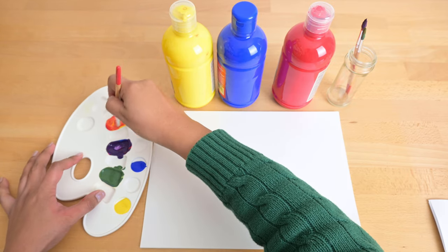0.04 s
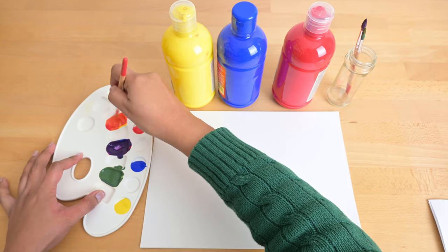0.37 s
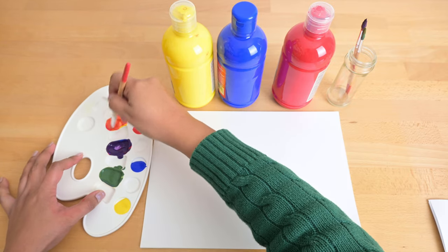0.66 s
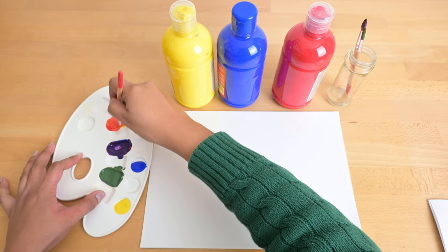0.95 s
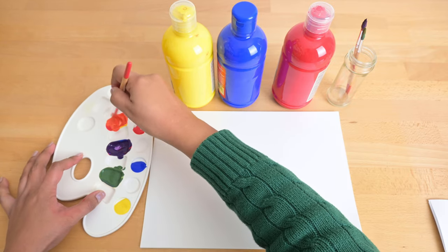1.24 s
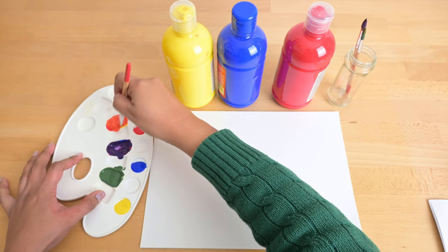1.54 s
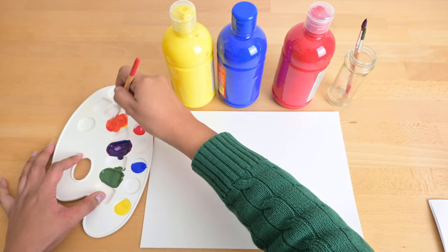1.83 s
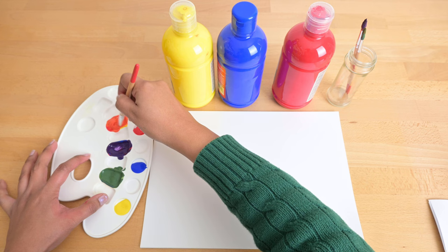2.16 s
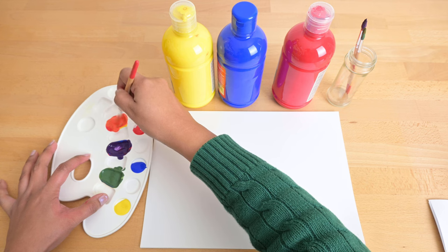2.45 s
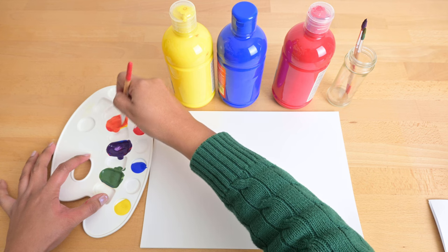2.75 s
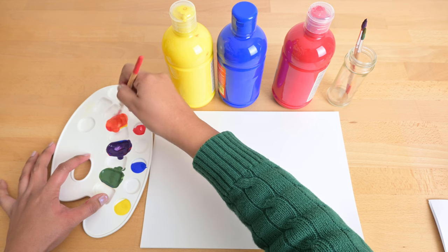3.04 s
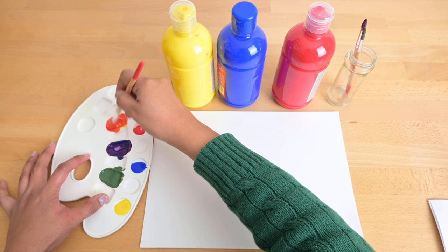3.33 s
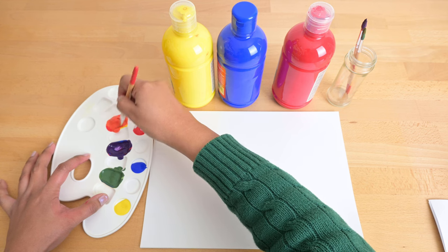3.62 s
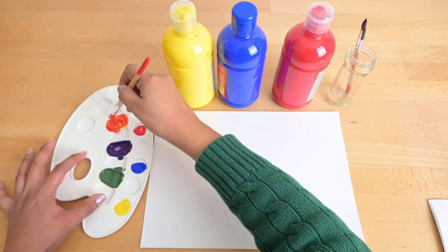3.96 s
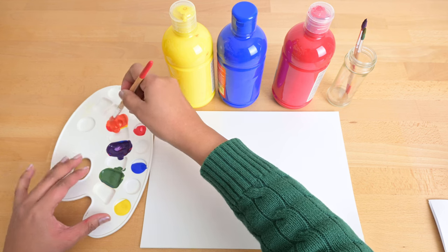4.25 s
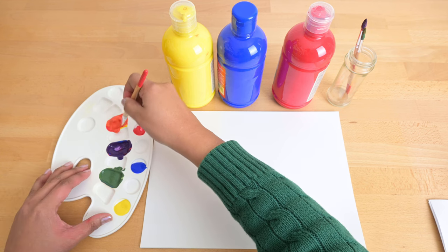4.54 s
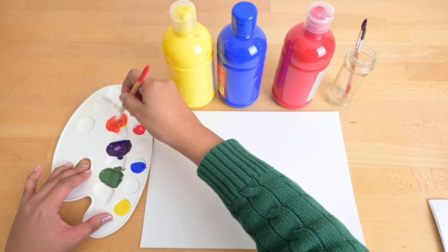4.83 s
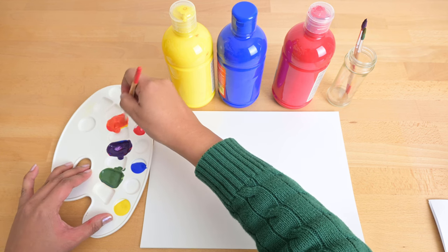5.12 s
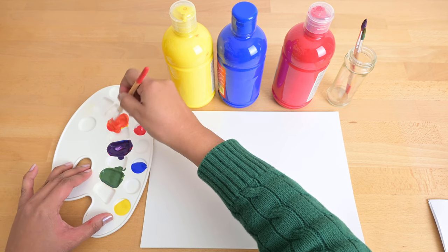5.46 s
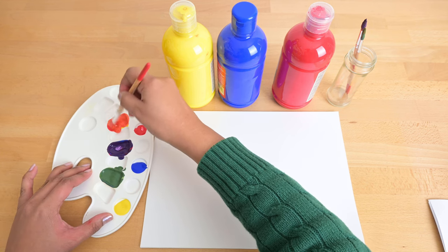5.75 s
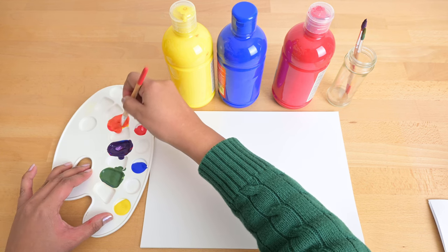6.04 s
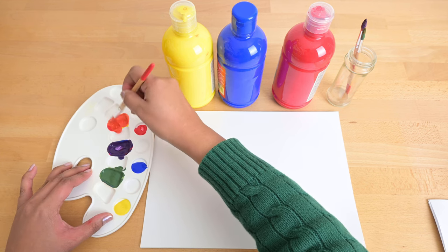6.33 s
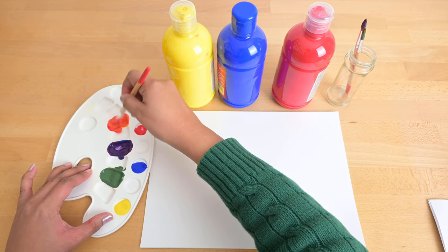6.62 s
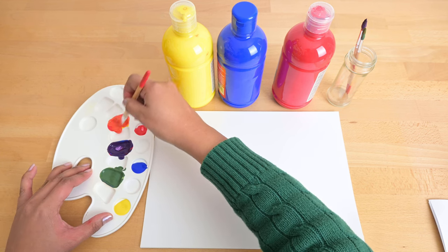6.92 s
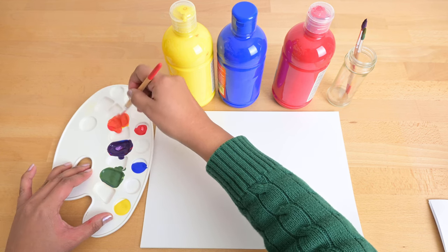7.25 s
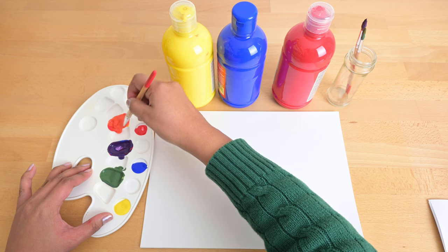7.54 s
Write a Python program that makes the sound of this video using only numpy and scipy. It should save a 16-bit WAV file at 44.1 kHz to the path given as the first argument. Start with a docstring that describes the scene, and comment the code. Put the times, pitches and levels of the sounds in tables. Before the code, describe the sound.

Quick, light knocks and faint swishes of a brush mixing paint in a plastic palette well, in a quiet room.

```python
"""In a small, quiet room, sticky paint rustles faintly in the well of a plastic palette on a wooden table.
A paintbrush starts dabbing, close to five times a second: the bristles swish and push the palette, and
the ferrule knocks the plate, brighter the harder it lands. From about one second on, the held palette
now and then bumps the table, clacks and slides, and the wet paint gives a few tiny ticks. The dabs
pause near four seconds, then resume and turn mostly lighter."""
import sys
import numpy as np
from scipy import signal
from scipy.fft import rfft, irfft, next_fast_len
from scipy.io import wavfile

SR = 44100
rng = np.random.default_rng(int(sys.argv[2]) if len(sys.argv) > 2 else 0)


def inscribe(sig):
    """Save sig as 16-bit PCM at rate SR to the path in sys.argv[1].

    A 1-D sig is mono; a 2-D sig holds one channel per row.
    Samples are clipped to [-1, 1] before scaling.
    """
    pcm = np.round(np.clip(np.atleast_2d(sig).T, -1, 1) * 32767)
    wavfile.write(sys.argv[1], SR, pcm.astype(np.int16))


N = 343098
TIME_S = np.arange(N) / SR
RING_S = TIME_S[:SR // 2]


def from_db(db):
    return 10 ** (np.asarray(db) / 20)


def unit_rms(x):
    return x / np.sqrt(np.mean(x ** 2) + 1e-20)


def at_hz(points, hz):
    """Reads a table on a log-frequency axis."""
    knots_hz, values = np.transpose(points)
    return np.interp(np.log(hz), np.log(knots_hz), values)


def add(track, start_s, sound):
    """Mixes a sound into a track in place."""
    start = max(round(start_s * SR), 0)
    span = track[start:start + len(sound)]
    span += sound[:len(span)]


def band(x, low_hz, high_hz):
    """Keeps the range that a part radiates well."""
    above = signal.sosfilt(signal.butter(4, low_hz, "high", fs=SR, output="sos"), x)
    return signal.sosfilt(signal.butter(6, high_hz, fs=SR, output="sos"), above)


def stereo_noise(coherence, size):
    """Spectra of two partly coherent white noises, and their frequencies."""
    hz = np.maximum(np.fft.rfftfreq(size, 1 / SR), 1)
    mid, side = rfft(rng.standard_normal((2, size)))
    alike = np.clip(at_hz(coherence, hz), -1, 1)
    return (np.sqrt(1 + alike) * mid + np.sqrt(1 - alike) * side * [[1], [-1]]) / np.sqrt(2), hz


def coloured(spectrum, coherence):
    """Steady stereo noise of a given colour, rolled off below 20 Hz, rms 1."""
    white, hz = stereo_noise(coherence, size=2 * next_fast_len(N // 2 + 1))
    shaped = white * from_db(at_hz(spectrum, hz)) * hz / np.hypot(hz, 20)
    return unit_rms(irfft(shaped)[:, :N])


def grain(per_s, spread_db):
    """A gain that flickers at random."""
    knots = rng.standard_normal(int(TIME_S[-1] * per_s) + 2)
    return unit_rms(from_db(spread_db * np.interp(TIME_S * per_s, np.arange(len(knots)), knots)))


def rubbing(moves, attack_s, sag_db, release_s):
    """Gain of rubbing moves: each swells, sags as it slows, and stops."""
    gain = np.zeros(N)
    for s, length_s, db in moves:
        early_s = np.maximum(s - TIME_S, 0)
        late_s = np.maximum(TIME_S - s - length_s, 0)
        progress = np.clip((TIME_S - s) / length_s, 0, 1)
        gain += from_db(db + sag_db * progress) * np.exp(-(early_s / attack_s) ** 2 - late_s / release_s)
    return gain


def contact(hardness_hz):
    """Force pulse of unit area: the softer the contact, the longer it lasts."""
    return signal.lfilter(*signal.butter(3, hardness_hz, fs=SR), signal.unit_impulse(256))


def strike(hits, modes, damping, detune, late_s=0):
    """Hits (s, dB, hardness Hz) ring all modes in step, hence the crack; damping divides each T60."""
    displacement = np.zeros(N)
    # spot and grip change, so each hit varies every mode's strength and pitch
    scatter = rng.standard_normal((len(hits), len(modes), 2))
    for (s, db, hardness_hz), draws in zip(hits, scatter):
        force = np.pad(contact(hardness_hz), (0, len(RING_S) // 2)) + 1e-18
        for (hz, mode_db, t60_s), (louder, higher) in zip(modes, draws):
            radius = from_db(-60 * damping / (t60_s * SR))
            angle = 2 * np.pi * hz * (1 + detune * higher) / SR
            ring = signal.lfilter([1], [1, -2 * radius * np.cos(angle), radius * radius], force)
            add(displacement, s + late_s, from_db(db + mode_db + 1.8 * louder) * ring)
    return np.diff(displacement, prepend=0)  # sound follows surface velocity


# Background noise. Each row: frequency in Hz, relative density in dB.
AMBIENCE_SPECTRUM = [(15, -38), (25, -6), (97, -1), (212, -10), (285, -6), (659, -18), (1070, -16),
                     (1370, -12.5), (1480, -17), (1610, -8), (1940, -18.5), (2610, -21), (2840, -23.5),
                     (10400, -29.5), (16000, -38.5)]
# Stereo image of background and rubbing. Each row: frequency in Hz, left-right coherence.
AMBIENCE_COHERENCE = [(60, 0.79), (500, 0.57), (1800, 0.59), (4000, 0), (8000, 0), (16000, 0.37)]


def ambience(rms_db=-51):
    """The room's steady, low hush."""
    return from_db(rms_db) * coloured(AMBIENCE_SPECTRUM, AMBIENCE_COHERENCE)


# Loaded bristles stir the paint. Each row: start in seconds, length in seconds, level in dB.
PAINT_STIRS = [(0, 1.5, -63.5), (4.72, 0.45, -55), (6.6, 0.35, -54.5)]
# Paint rustle. Each row: frequency in Hz, relative density in dB.
SMEAR_SPECTRUM = [(150, -15), (500, 3.5), (800, -3.5), (1250, 0.5), (1680, -9), (2100, -10), (2600, -3),
                  (3600, -18), (7000, -31)]


def smear():
    """Sticky paint rustles faintly through the plate."""
    stickiness = grain(per_s=200, spread_db=3.5)
    gain = rubbing(PAINT_STIRS, attack_s=0.1, sag_db=-1, release_s=0.07)
    return gain * stickiness * coloured(SMEAR_SPECTRUM, AMBIENCE_COHERENCE)


# Dabs into the well. Each row: start in seconds, relative ferrule tap in dB,
# relative bristle swish in dB, seconds from the tap to the widest splay.
BRUSH_DABS = [(0.105, -31.5, -55.5, 0.0027), (.3265, -15, -54.5, 0.0045), (0.543, -6, -50.5, 0.01),
              (.77, -8, -49, 0.011), (.987, -7, -48, 0.0092), (1.193, -4.5, -51.5, 0.011),
              (1.423, -11, -52, 0.00031), (1.6127, -11.5, -57, 0.024), (1.784, -7.5, -62, 0.045),
              (2.3824, -11, -58.5, 0.046), (2.5712, -13.5, -61, 0.00024), (2.7873, -13.5, -54.5, 0.0065),
              (3.0076, -13, -51.5, 0.016), (3.2304, -12, -57.5, .01), (3.4464, -12.5, -62, 0.0022),
              (3.6648, -9.5, -53.5, 0.0087), (3.8743, -6.5, -48.5, 0.012), (4.567, -44, -56, 0.011),
              (4.828, -21.5, -52, -0.0054), (5.0158, -8, -51, 0.023), (5.23, -14.5, -56, .02),
              (5.4293, -15.5, -53, 0.023), (5.6571, -29.5, -55.5, 0.0079), (5.877, -22, -54.5, 0.0037),
              (6.0852, -19, -51, 0.005), (6.3049, -22, -57.5, 0.0068), (6.5221, -26, -70, 0.02),
              (6.729, -24.5, -66, 0.043), (6.9676, -27, -78, 0.016), (7.1841, -17.5, -56, 0.01),
              (7.392, -14, -54.5, 0.018), (7.6108, -24, -59, 0.00048)]
# Hand weight on the bristles, light as each bout begins. Each row: time in seconds, relative level in dB.
HAND_LOAD = [(.1, -29), (.33, -15), (3.87, -14.5), (4.57, -29), (4.83, -17.5), (6.1, -9), (6.7, -12.5),
             (7.4, -11.5)]
# Glancing knocks on the well's wall. Each row: start in seconds, relative tap in dB, hardness in Hz.
GLANCING_KNOCKS = [(1.0136, -19.5, 3200), (2.0074, -13.5, 2780), (2.017, -19, 2730), (2.1553, -6.5, 1770),
                   (2.2056, -21.5, 1630), (3.89, -5.5, 1960), (4.0298, -15.5, 2600), (4.0958, -33, 3300),
                   (4.5094, -9.5, 1510), (4.5416, -16.5, 1450), (6.8761, -26, 1260)]


def blows(light_hz=2550, stiffening_hz=3000, dab_push_db=-4, glance_push_db=-7, glance_well_db=3.5):
    """Lists (s, hardness Hz, well dB, plate dB, push dB); a stronger dab is stiffer and pushes more."""
    s, tap_db, _, _ = np.transpose(BRUSH_DABS)
    hardness_hz = light_hz + stiffening_hz * from_db(tap_db)
    weight = from_db(np.interp(s, *np.transpose(HAND_LOAD)))
    push_db = 20 * np.log10(np.hypot(weight, from_db(tap_db + dab_push_db)))
    glances = [(at, hz, db + glance_well_db, db, db + glance_push_db) for at, db, hz in GLANCING_KNOCKS]
    return list(zip(s, hardness_hz, tap_db, tap_db, push_db)) + glances


# Modes of the well at the contact, the bending plate, and the whole palette on the table.
# Each row: frequency in Hz, relative level in dB, T60 in seconds before damping.
WELL_MODES = [(1590, -52, 0.015), (1774, -15.5, 0.0081), (2160, -27, 0.014), (2890, -38.5, 0.027),
              (3765, -17, 0.018), (4230, -7.5, 0.006), (4860, -16, 0.008)]
PLATE_MODES = [(1060, -29, 0.38), (1173, -26, 0.13), (1317, -22, 0.15), (1352, -36.5, 0.62),
               (1488, -34, 0.062), (1520, -17, 0.066), (1684.4, -10, 0.055), (1752, -12, 0.067),
               (1774, -25.5, 0.083), (1910, -25, 0.091), (1932, -23.5, 0.064), (2106, -12.5, 0.026),
               (2320, -15.5, 0.048), (2328, -27.5, 0.13), (2405, -25.5, 0.11), (2600, -47, 0.46),
               (2665, -74, 0.3), (2986, -27, 0.094), (3120, -20, 0.034)]
BODY_MODES = [(61, -41, 0.096), (178.8, -38, 0.31), (244.9, -31.5, 0.44), (298.4, -37.5, 0.36),
              (383, -29.5, 0.17), (465, -13, 0.091), (520, -36.5, 0.1), (589.2, -17, 0.089),
              (649, -27.5, 0.35)]


def knocks(push_hz=900, cushioning=0.32):
    """The well and the plate crack first; the whole palette answers a moment later."""
    s, hardness_hz, well_db, tap_db, push_db = np.transpose(blows())
    # the push is softer when the bristles take most of the blow
    soft_hz = push_hz * from_db(cushioning * (tap_db - push_db))
    well = strike(list(zip(s, well_db, hardness_hz)), WELL_MODES, damping=1, detune=0.026)
    plate = strike(list(zip(s, tap_db, hardness_hz)), PLATE_MODES, damping=1.45, detune=0.0051)
    body = strike(list(zip(s, push_db, soft_hz)), BODY_MODES, damping=1.22, detune=0.014, late_s=0.0013)
    crack = band(from_db(-3) * well + from_db(-1) * plate, low_hz=1230, high_hz=4600)
    return dispersion(crack) + from_db(-1.07) * band(body, low_hz=40, high_hz=680)


def dispersion(x, slow_hz=1100, width_hz=1000):
    """Low bending waves cross the plate later than high ones, so each crack sweeps briefly down."""
    radius = np.exp(-np.pi * width_hz / SR)
    poles = [1, -2 * radius * np.cos(2 * np.pi * slow_hz / SR), radius * radius]
    return signal.lfilter(poles[::-1], poles, x)


# The palette's countless weaker modes. Each row: frequency in Hz, relative density in dB.
BLUR_SPECTRUM = [(150, -16.5), (260, 0.5), (600, 1), (850, -4), (1300, -1), (1750, 6.5), (2400, 2),
                 (3100, -1), (4200, -13), (5500, -9.5), (9000, -11.5)]


def mode_blur(onset_s=0.0013, quick_t60_s=0.017, slow_t60_s=0.28, slow_db=-10, thud_db=-9, thud_hz=1300):
    """Crowded modes and their reflections merge into a noisy decay; the push adds a dull thud."""
    decay = from_db(-60 * RING_S / quick_t60_s) + from_db(slow_db - 60 * RING_S / slow_t60_s)
    decay *= 1 - np.exp(-RING_S / onset_s)
    out = np.zeros((2, N))
    for s, hardness_hz, _, tap_db, push_db in blows():
        white, hz = stereo_noise(ROOM_COHERENCE, size=len(RING_S))
        tap = from_db(tap_db) / np.hypot(1, (hz / hardness_hz) ** 2)
        thud = from_db(push_db + thud_db) / np.hypot(1, (hz / thud_hz) ** 4)
        spectrum = white * from_db(at_hz(BLUR_SPECTRUM, hz)) * np.hypot(tap, thud)
        burst = irfft(spectrum, len(RING_S)) * decay
        for track, side in zip(out, burst):
            add(track, s, from_db(-6.5) * side)
    return out


# Bristle hiss. Each row: frequency in Hz, relative density in dB.
SWISH_SPECTRUM = [(600, 8.5), (1700, 12), (3000, 1), (4700, 3.5), (6500, 0.5), (8200, -9), (10500, -5),
                  (13000, -11), (16000, -15)]


def bristles(lead_s=0.1, rise_s=0.012, fall_s=0.03, tail_s=0.093, tail_db=-14):
    """Many hairs rub at once: a grainy hiss that swells and fades with each dab."""
    before_s, after_s = np.minimum(RING_S - lead_s, 0), np.maximum(RING_S - lead_s, 0)
    swell = np.exp(-(before_s / rise_s) ** 2 / 2)
    fade = np.exp(-(after_s / fall_s) ** 2) + from_db(tail_db) * np.exp(-after_s / tail_s)
    power = np.zeros(N)
    for s, _, swish_db, splay_s in BRUSH_DABS:
        add(power, s + splay_s - lead_s, (from_db(swish_db) * swell * fade) ** 2)
    hairs = grain(per_s=800, spread_db=2.5) * grain(per_s=110, spread_db=1.0)
    return from_db(10) * np.sqrt(power) * hairs * coloured(SWISH_SPECTRUM, ROOM_COHERENCE)


# The palette rocks against the table. Each row: start in seconds, level in dB, frequency in Hz.
TABLE_BUMPS = [(0.861, -36.5, 61), (1.952, -44, 65), (4.0, -37.5, 69.4), (5.61, -30.5, 57.5),
               (5.985, -33, 61.2), (7.015, -44, 94.3), (7.746, -33.5, 66)]


def bumps(swell_s=0.022, unevenness=0.32, back_s=0.059, back_db=-6.5, back_ratio=1.42):
    """Soft loads give the table top a few low, uneven swings; each rock back is weaker and quicker."""
    out, age = np.zeros(N), RING_S / swell_s
    envelope = (age / 2) ** 2 * np.exp(2 - age)
    low_band = signal.butter(2, [40, 140], "band", fs=SR, output="sos")
    rock_backs = [(s + back_s, db + back_db, hz * back_ratio) for s, db, hz in TABLE_BUMPS]
    for s, db, hz in TABLE_BUMPS + rock_backs:
        rumble = unit_rms(signal.sosfilt(low_band, rng.standard_normal(len(age))))
        swing = np.sin(2 * np.pi * hz * RING_S) + unevenness * rumble
        add(out, s, from_db(db) * envelope * swing)
    return out


# The rim lands on the table. Each row: start in seconds, relative level in dB.
RIM_CLACKS = [(.920, -26), (1.0588, -12), (1.9692, -16.5), (2.5285, -32), (2.618, -11)]
# Rim modes. Each row: frequency in Hz, relative level in dB, T60 in seconds before damping.
RIM_MODES = [(1030, -38, 0.079), (1204, -9.5, 0.024), (1480, -13, 0.018), (1620, -12.5, 0.017),
             (2570, -13, 0.037), (2650, -30, 0.029), (3310, -20.5, 0.045), (3970, -31, 0.031),
             (4630, -30, .01)]


def clacks(bounce_s=0.0056, bounce_db=-2, hardness_hz=3900):
    """The rim lands and bounces once, on a slightly different spot."""
    hits = []
    for s, db in RIM_CLACKS:
        hits += [(s, db, hardness_hz), (s + bounce_s, db + bounce_db, hardness_hz)]
    rim = strike(hits, RIM_MODES, damping=1.21, detune=0.032)
    return from_db(1) * band(rim, low_hz=600, high_hz=6200)


# Wet paint parts. Each row: start in seconds, peak level in dB, centre frequency in Hz.
PAINT_TICKS = [(1.962, -34, 14400), (3.098, -32, 10600), (3.0963, -32.5, 7900), (4.646, -34, 15000),
               (5.85, -48, 13000)]


def ticks(width_hz=1600, t60_s=0.015):
    """Tiny films of paint snap with a short, very high fizz."""
    out = np.zeros(N)
    for s, db, hz in PAINT_TICKS:
        burst = rng.standard_normal(len(RING_S)) * from_db(-60 * RING_S / t60_s)
        snap = signal.lfilter(*signal.iirpeak(hz, hz / width_hz, fs=SR), burst)
        add(out, s, from_db(db) * snap / np.abs(snap).max())
    return out


# The palette slides. Each row: start in seconds, length in seconds, level in dB.
PALETTE_SLIDES = [(1.985, 0.072, -33), (4.02, 0.23, -44.5), (4.5, 0.38, -54)]
# Plastic rubbing on wood. Each row: frequency in Hz, relative density in dB.
DRAG_SPECTRUM = [(100, -9), (200, -23), (240, 5), (290, -10.5), (480, -17), (750, -15), (1700, -20.5),
                 (3000, -25.5), (6000, -51)]


def drag():
    """The palette judders as it slides on the wood."""
    judder = grain(per_s=120, spread_db=3.0)
    gain = rubbing(PALETTE_SLIDES, attack_s=0.012, sag_db=-6.5, release_s=0.023)
    return gain * judder * coloured(DRAG_SPECTRUM, AMBIENCE_COHERENCE)


# Stereo image of reflections, blur and swish. Each row: frequency in Hz, left-right coherence.
ROOM_COHERENCE = [(100, 0.99), (500, 0.93), (2000, 0.82), (4000, 0.25), (8000, 0.14), (16000, 0.022)]
# Strength of the reflections. Each row: frequency in Hz, gain in dB.
ROOM_GAIN_DB = [(60, 19), (250, -8), (500, -5.5), (900, -3.5), (1700, -11), (3000, -5), (6000, -10),
                (14000, 2.5)]
# Decay of the tail. Each row: frequency in Hz, T60 in seconds.
ROOM_T60_S = [(100, 0.37), (500, 0.34), (2000, 0.32), (5000, 0.24), (15000, 0.098)]


def room(x, first_s=0.00545, early_t60_s=0.036, early_db=7):
    """Table, bottles and walls: dense early reflections, then a tail that dies sooner in the treble."""
    white, hz = stereo_noise(ROOM_COHERENCE, size=len(RING_S))
    spectrum = white * from_db(at_hz(ROOM_GAIN_DB, hz))
    early = from_db(early_db - 60 * RING_S / early_t60_s)
    response = 0
    for centre_hz in 31.25 * 2 ** np.arange(10):
        window = np.maximum(1 - np.abs(np.log2(hz / centre_hz)), 0)
        octave = irfft(spectrum * window, len(RING_S))
        tail = from_db(-60 * RING_S / at_hz(ROOM_T60_S, centre_hz))
        decay = (early + tail) * (RING_S > first_s)
        response = response + octave * decay / np.sqrt(np.sum(decay ** 2))
    return signal.fftconvolve(x[None], response, axes=1)[:, :N]


def scene():
    """Palette, brush and the quiet room around them."""
    palette = knocks() + clacks() + ticks()
    # the palette lies a little to the left: the right channel lags one sample
    direct = np.array([palette, np.append(0, palette[:-1])])
    return ambience() + direct + room(palette) + mode_blur() + bumps() + bristles() + smear() + drag()


def record(dry):
    """Steep low-pass at 16 kHz."""
    return signal.sosfilt(signal.ellip(10, 0.1, 80, 16000, fs=SR, output="sos"), dry)


dry = scene()
out = record(dry)
inscribe(out)
```